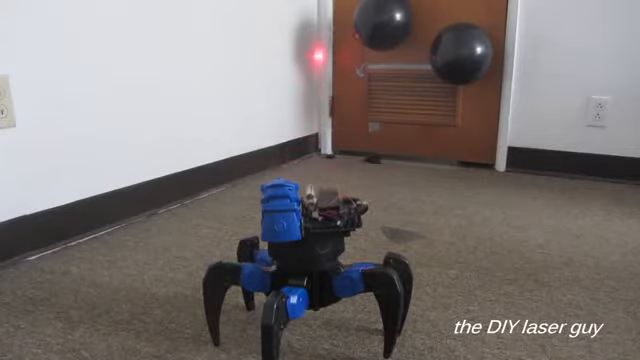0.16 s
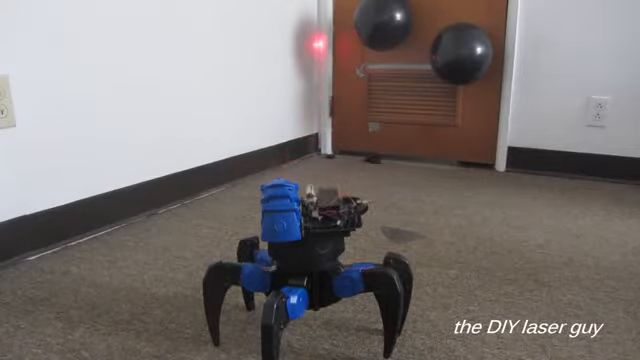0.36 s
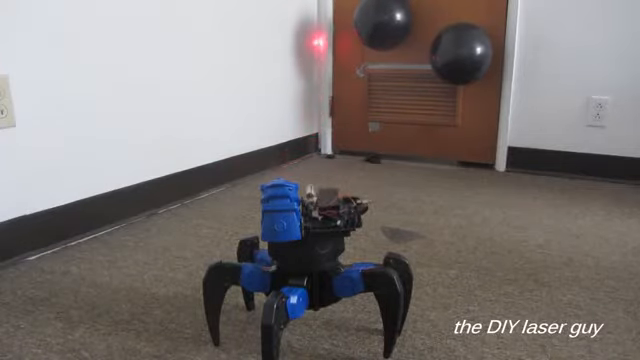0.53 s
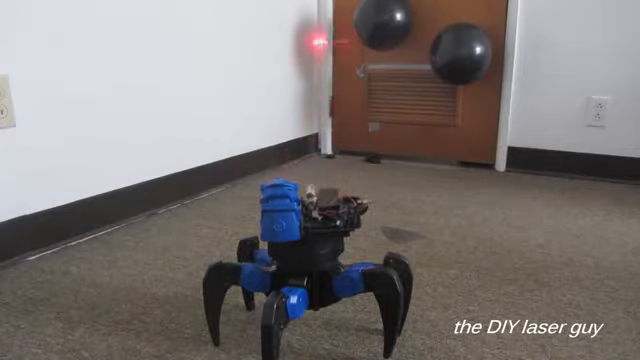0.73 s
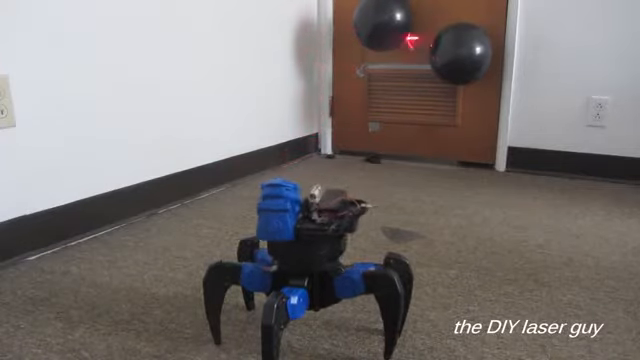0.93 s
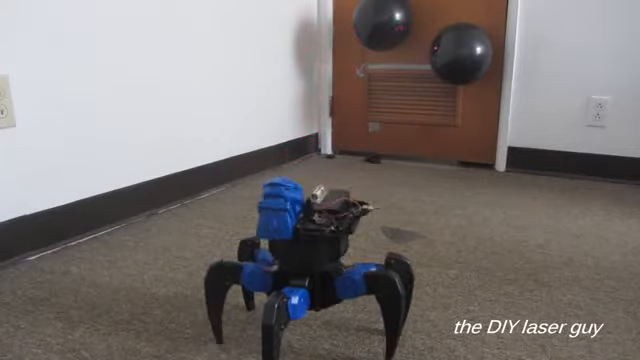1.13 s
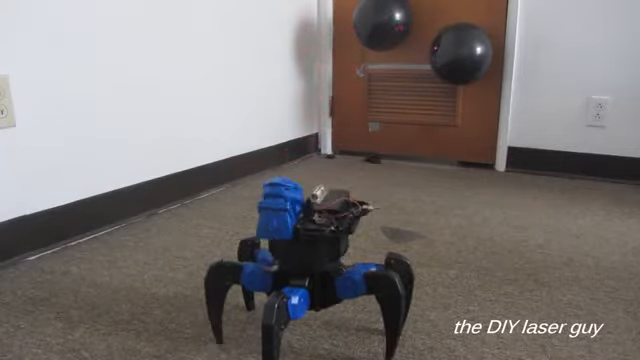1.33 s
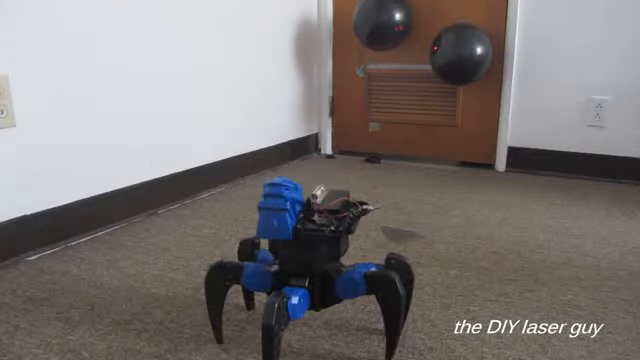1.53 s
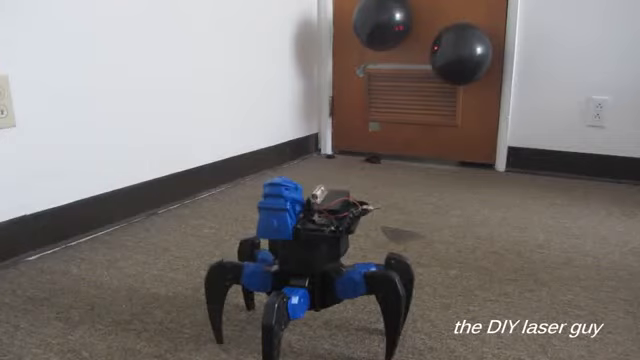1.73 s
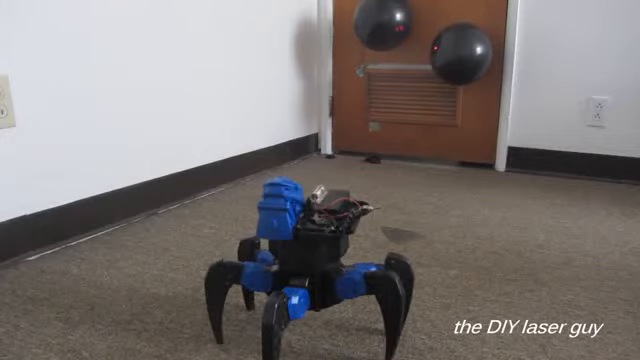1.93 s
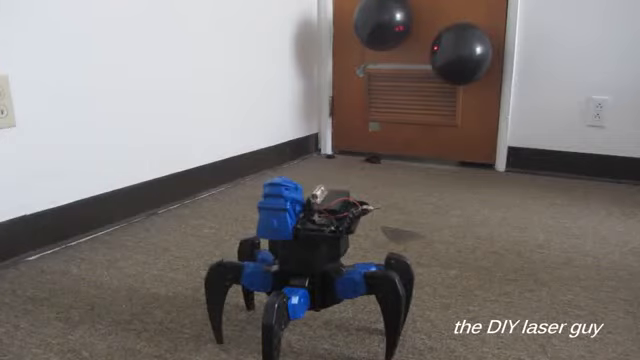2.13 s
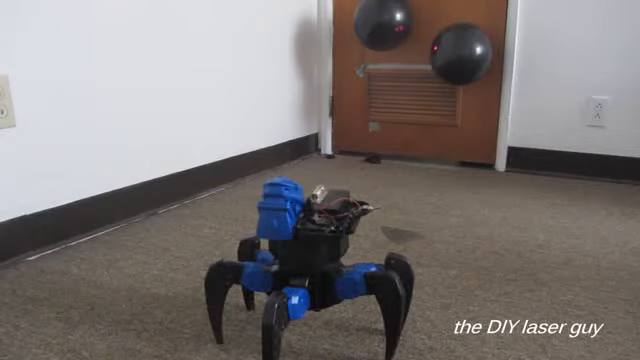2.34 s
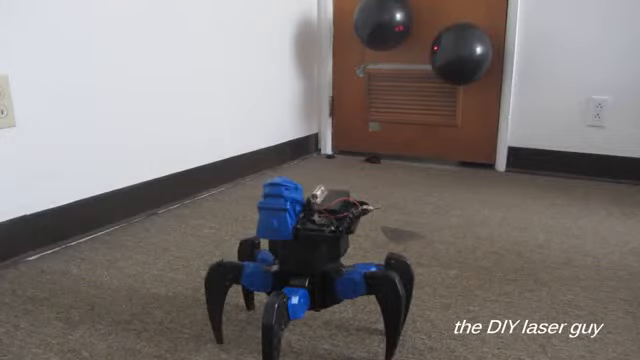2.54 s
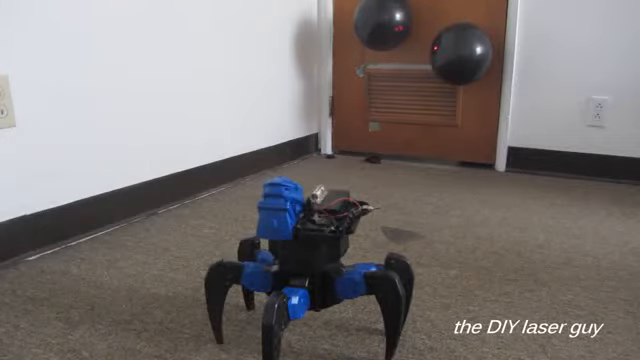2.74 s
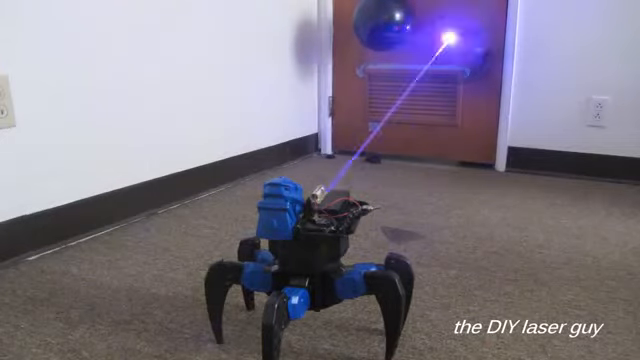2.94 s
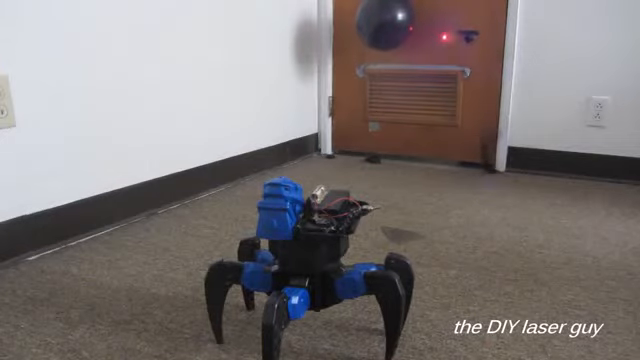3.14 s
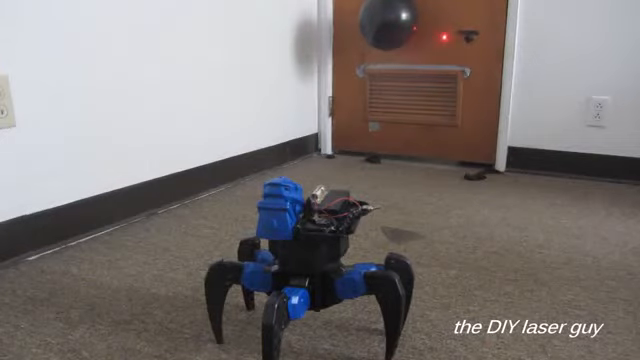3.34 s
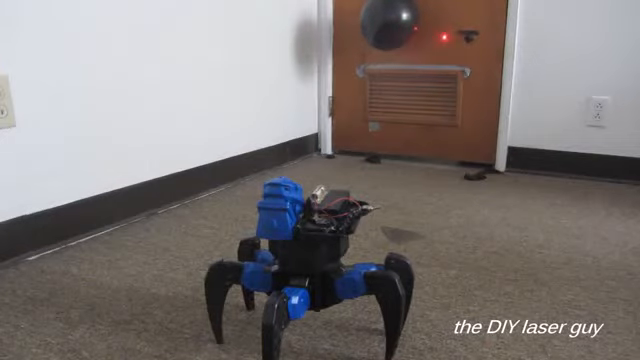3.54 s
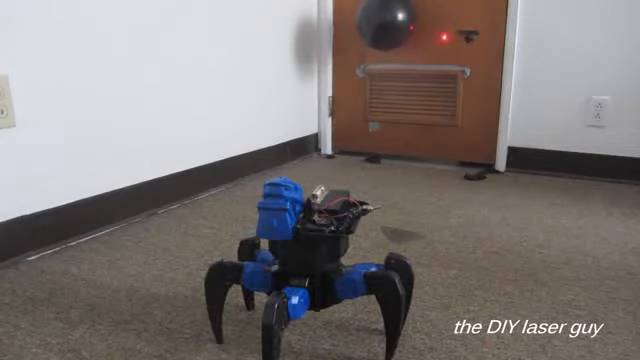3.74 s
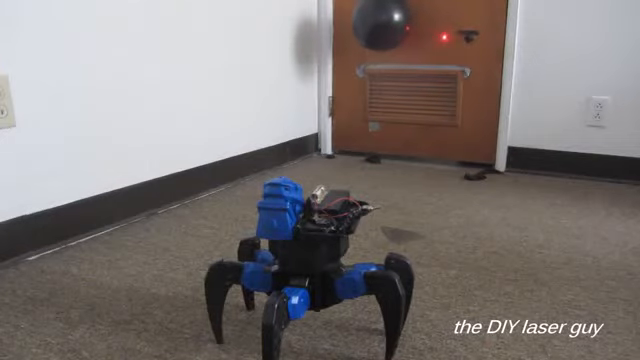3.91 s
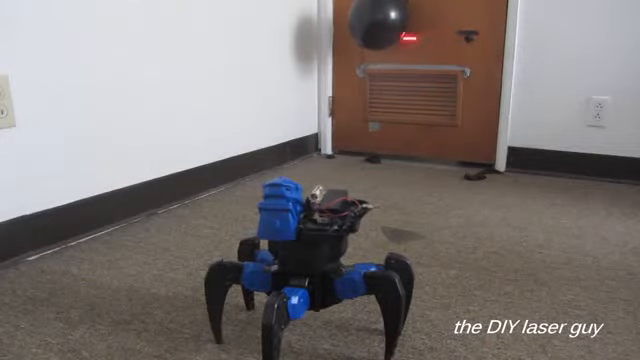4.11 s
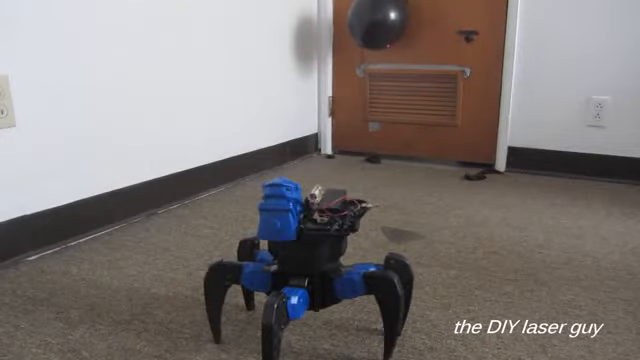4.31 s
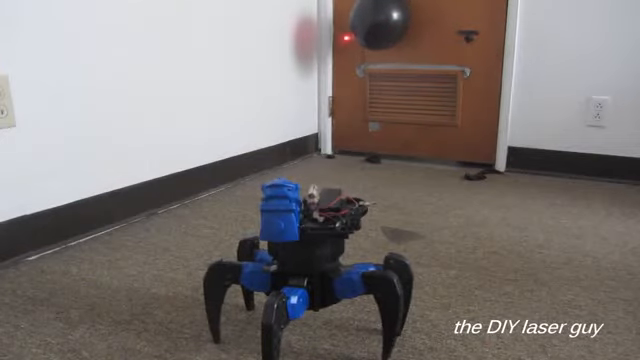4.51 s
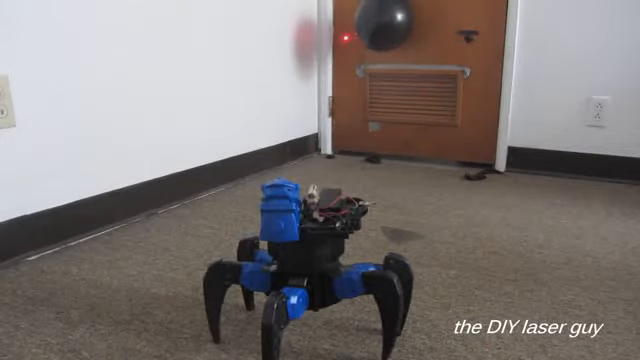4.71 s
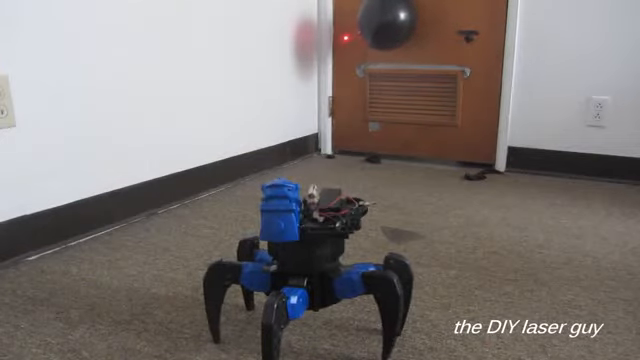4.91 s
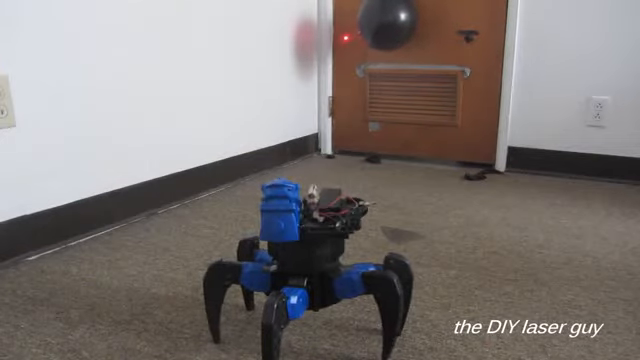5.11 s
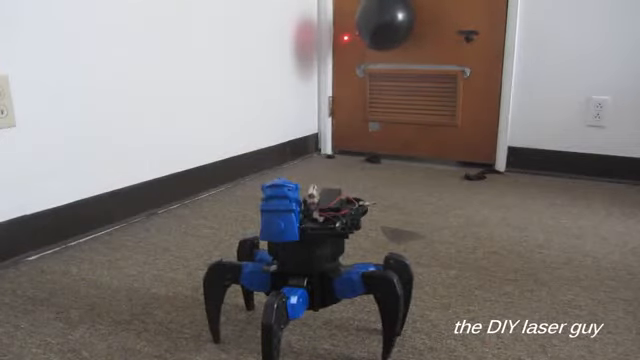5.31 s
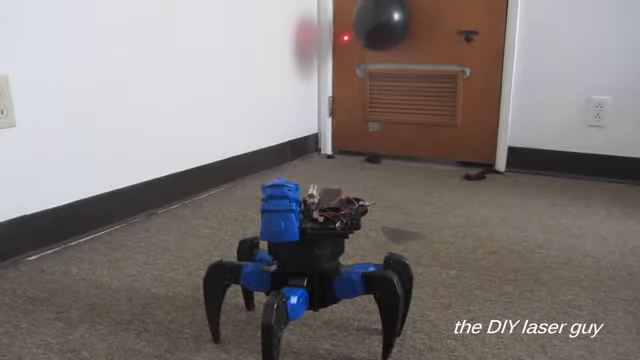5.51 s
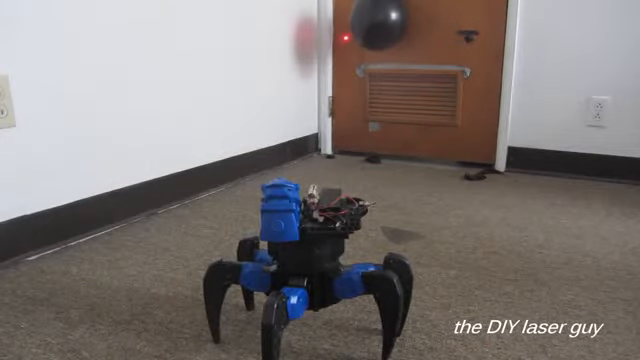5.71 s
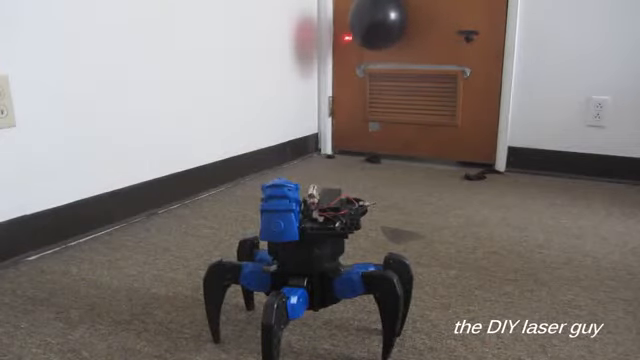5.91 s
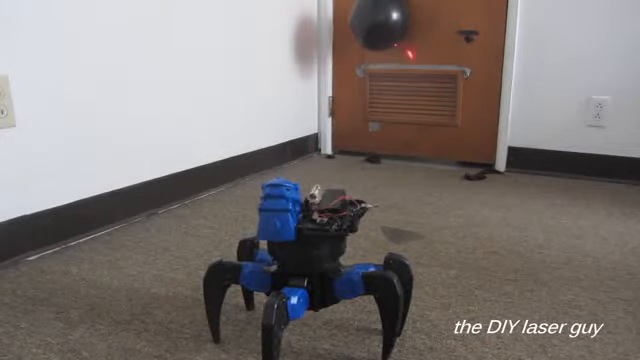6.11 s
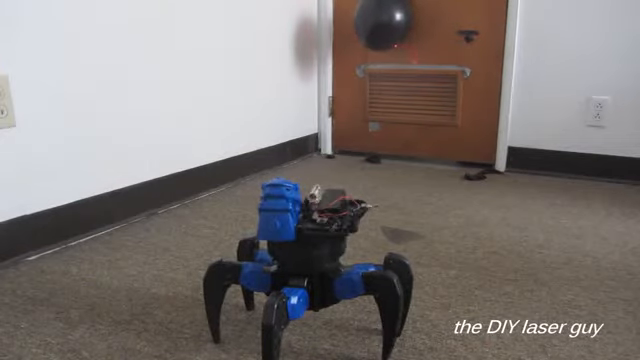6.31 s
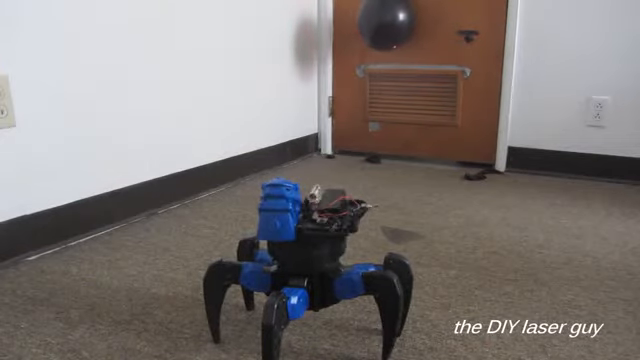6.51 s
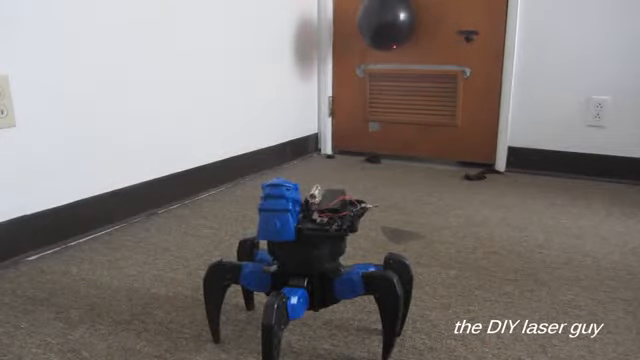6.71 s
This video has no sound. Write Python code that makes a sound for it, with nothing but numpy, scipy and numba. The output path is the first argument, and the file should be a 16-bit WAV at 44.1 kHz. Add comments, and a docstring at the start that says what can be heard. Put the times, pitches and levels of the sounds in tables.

```python
"""A bare, carpeted room: a toy robot tilts and turns its turret in short motor bursts, made of gear
knocks ringing through resonances; buttons of a hand control click close by as struck case modes.
A balloon on the far door bursts as an N-shaped pulse, and the room answers with decaying noise.
The recorder's gain control ducks at the bang and creeps back, lifting the room tone with it."""
import sys
import numpy as np
from scipy import signal
from scipy.fft import rfft, irfft, next_fast_len
from scipy.io import wavfile
from numba import njit

SR = 44100
rng = np.random.default_rng(int(sys.argv[2]) if len(sys.argv) > 2 else 0)


def generate_wav(sig):
    """Save sig (samples, or channels by samples) to the path in sys.argv[1] as 16-bit PCM at SR."""
    pcm = np.round(np.clip(np.atleast_2d(sig).T, -1, 1) * 32767).astype(np.int16)
    wavfile.write(sys.argv[1], SR, pcm)


def rack_gain(trim_db):
    """Turn a fader trim in dB into the linear factor to multiply a signal by."""
    fader = np.asarray(trim_db, float)
    return 10 ** (fader / 20)


N = 297675
TIME = np.arange(N) / SR   # [s]
BURST_S = 3.0497


def rms_one(x):
    """Normalization: scale a signal to rms 1."""
    return x / np.sqrt(np.mean(x ** 2) + 1e-20)


def at_hz(points, hz):
    """Interpolation on a logarithmic frequency axis in a table of (frequency [Hz], value)."""
    table = np.array(points)
    return np.interp(np.log(hz), np.log(table[:, 0]), table[:, 1])


def filtered(x, order, hz, kind="low"):
    """Butterworth filtering: a maximally flat pass band above or below a corner frequency."""
    return signal.sosfilt(signal.butter(order, hz, kind, fs=SR, output="sos"), x)


def colour(x, spectrum):
    """Spectral shaping: multiply the spectrum by a gain table of (frequency [Hz], level [dB])."""
    size = next_fast_len(x.shape[-1])
    hz = np.maximum(np.fft.rfftfreq(size, 1 / SR), 1)
    return irfft(rfft(x, size) * rack_gain(at_hz(spectrum, hz)), size)[..., :x.shape[-1]]


def stereo_noise(likeness, count):
    """Interchannel correlation: independent mid and side noise, weighted at each frequency."""
    size = next_fast_len(count)
    hz = np.maximum(np.fft.rfftfreq(size, 1 / SR), 1)
    alike = np.clip(at_hz(likeness, hz), -1, 1)
    mid, side = rfft(rng.standard_normal((2, size)))
    both = mid * np.sqrt(1 + alike) + side * np.sqrt(1 - alike) * [[1], [-1]]
    return irfft(both, size)[:, :count]


def resonate(x, modes):
    """Modal superposition: parallel two-pole resonances with alternating signs, scaled to rms 1."""
    out = 0
    for k, (hz, width, level_db) in enumerate(modes):
        r = np.exp(-np.pi * width / SR)
        poles = [1, -2 * r * np.cos(2 * np.pi * hz / SR), r * r]
        zeros = [(1 - r * r) / 2, 0, (r * r - 1) / 2]
        out = out + (-1) ** k * rack_gain(level_db) * signal.lfilter(zeros, poles, x)
    return rms_one(out)


@njit
def glide(x, turn, r):
    """Time-varying resonance: pole radius r is fixed, turn is the cosine of the moving pole angle."""
    y = np.zeros(len(x))
    for i in range(2, len(x)):
        y[i] = x[i] - x[i - 2] + 2 * r * turn[i] * y[i - 1] - r * r * y[i - 2]
    return y


def ring(blows, hz, t60):
    """Impulse response of a damped mode: a unit blow starts a decaying sine of initial height 1."""
    r, w = rack_gain(-60 / (t60 * SR)), 2 * np.pi * hz / SR
    return signal.lfilter([0, np.sin(w)], [1, -2 * r * np.cos(w), r * r], blows)


def room_tone():
    """Stationary noise: shaped air and building noise, with a swelling bass drone and a dying rumble."""
    # spectrum of the air and building noise: (frequency [Hz], relative spectral level [dB])
    tone_spectrum = [(12, -44.5), (20, -22.5), (87, -5), (197, -2.5), (237, -5.5), (434, -10), (1380, -20),
                     (1580, -23), (2740, -26.5), (3760, -33), (5570, -31.5), (8720, -41), (10800, -46),
                     (14000, -71.5), (22000, -120)]
    # left-right likeness of that noise: (frequency [Hz], correlation [-1 to 1])
    tone_likeness = [(60, 0.29), (140, -0.6), (330, -0.6), (790, -0.18), (1850, 0.27), (4370, -0.048),
                     (10300, 0.82)]
    # swells of a distant drone: (time of the maximum [s], level [dB])
    swells = [(0.95, -68.5), (1.75, -63.5), (2.3, -64), (2.85, -64), (3.94, -69.5), (5.08, -71.5),
              (5.7, -61)]
    swell_db_per_s, drone_low_db = 31, -95.5
    tone_db, rumble_db, rumble_t60_s = -55.5, -63.5, 3.0

    air = rack_gain(tone_db) * rms_one(colour(stereo_noise(tone_likeness, N), tone_spectrum))
    # the same narrow resonance twice gives steeper skirts
    drone_mode = [(90, 8.8, 0)]
    drone = resonate(resonate(rng.standard_normal(N), drone_mode), drone_mode)
    swell_db = np.max([db - swell_db_per_s * np.abs(TIME - s) for s, db in swells], axis=0)
    drone = rack_gain(np.maximum(swell_db, drone_low_db)) * drone
    rumble_noise = resonate(rng.standard_normal(N), [(55, 40, 0)])
    rumble = rack_gain(rumble_db - 60 * TIME / rumble_t60_s) * rumble_noise
    return air + rumble + drone


def room_response():
    """Diffuse reverberation: overlapping half-octaves of noise, each dying at its own rate."""
    # reverberation of the room: (frequency [Hz], t60 [s])
    room_t60 = [(60, 0.84), (160, 0.64), (420, 0.66), (1100, 0.74), (2910, 0.8), (7680, 0.51)]
    # left-right likeness of the reflections: (frequency [Hz], correlation [-1 to 1])
    room_likeness = [(60, 0.76), (110, 0.78), (220, 0.75), (410, 0.52), (790, 0.19), (1500, 0.12),
                     (2850, 0.3), (5420, 1), (10300, 0.81)]
    t, out = TIME[:SR], 0
    noise = rfft(stereo_noise(room_likeness, SR))
    octave = np.log2(np.arange(SR // 2 + 1) + 1)
    for centre in np.arange(5, 14.1, .5):   # log2 of the centre frequency in Hz
        t60 = at_hz(room_t60, 2 ** centre)
        band = irfft(noise * np.maximum(1 - 2 * np.abs(octave - centre), 0), SR)
        # a slower decay starts lower, so that every band carries the same energy per Hz
        out = out + band * rack_gain(-60 * t / t60) / np.sqrt(t60 * SR / 14)
    return out * (1 - np.exp(-t / 0.0043))   # reflections thicken over the first milliseconds


def balloon():
    """N-wave radiation: a falling pressure ramp, doubled by door and floor, on a slow push of air."""
    burst_db, burst_ms = -3, .62
    phase = (TIME - BURST_S) / (burst_ms / 1000)
    pulse = np.where((phase > 0) & (phase < 1), 1 - 2 * phase, 0)
    pulse = filtered(pulse, 2, 3500)
    crack = pulse
    for delay_s, gain in [(0.00051, 1.4), (0.0016, 1.8), (.0034, 1.4)]:
        crack = crack + gain * np.roll(pulse, round(delay_s * SR))
    # the released air: a half sine of 1 ms
    push = np.sin(np.pi * np.clip((TIME - BURST_S - .0005) / .001, 0, 1))
    return rack_gain(burst_db) * filtered(crack + 0.47 * push, 2, 130., "high")


def balloon_tail(room):
    """Reverberation and modal decay: the walls return the bang, and the shaken door rings on."""
    # bang as the room returns it: (frequency [Hz], relative spectral level [dB])
    burst_colour = [(24, -60), (40, -26), (115, -17), (167, -3.5), (231, -9.5), (307, 1), (378, -8.5),
                    (406, -1.5), (664, -10), (764, -14.5), (1340, -12), (1650, -6), (2520, -18.5),
                    (3200, -17.5), (3750, -24.5), (6280, -23), (10800, -33.5), (14000, -74), (22000, -120)]
    # door panels shaken by the bang: (frequency [Hz], relative level [dB], t60 [s])
    door_modes = [(175, -6, .6), (269, -4, .6), (312, 0, .75), (412, -4, .9), (462, -8, .9),
                  (480, -10, 1.2), (515, -8, 1.0), (567, -8, 1.15), (673, -11, .7), (1230, -12, .7),
                  (1604, -10, 1.0), (1670, -6, .9), (1790, -12.5, .8), (1965, -13, 1.15), (1990, -15, 1.0)]
    start = round((BURST_S + .001) * SR)
    tail, blow = np.zeros((2, N)), np.full(N, 1e-18)
    tail[:, start:start + room.shape[1]] = room
    blow[start] = 1
    door = 0
    for hz, level_db, t60 in door_modes:
        channel_gains = rng.uniform(.6, 1, (2, 1))
        door = door + rack_gain(level_db) * channel_gains * ring(blow, hz, t60)
    walls = colour(tail, burst_colour) * (TIME > BURST_S)
    return rack_gain(48.5) * walls + rack_gain(-11.5) * door


def buttons():
    """Impact excitation: a run of contacts rings case modes near its pitch most, its snap all of them."""
    # clicks: (time [s], relative peak level [dB], strongest pitch [Hz], snap re peak [dB], ring re peak [dB])
    click_table = [(1.194, -36.5, 679, -32.5, -43), (1.532, -46, 1020, -15.5, -47),
                   (1.874, -32.5, 462, -26, -36), (1.883, -36, 770, -33, -46),
                   (2.74, -40.5, 2134, -17, -31.5), (4.27, -38, 484.5, -24, -34),
                   (4.526, -39, 496, -6, -37), (4.76, -36.5, 557, -23.5, -54),
                   (4.878, -61.5, 1200, -14, -25), (5.163, -40, 473, -38.5, -40),
                   (5.261, -32, 900, -26, -51.5), (5.494, -36, 670, -16.5, -44),
                   (5.746, -34, 840, -16.5, -26), (6.434, -39.5, 3170, -10.5, -28.5),
                   (6.713, -46.5, 3100, -29, -20.5)]
    # case of the hand control: (frequency [Hz], relative level [dB], t60 [s])
    case_modes = [(474, 0, .022), (813, 0, .025), (1250, -2, .012), (1850, -3, .008), (2450, -4, .006),
                  (3400, -1, .006), (3900, -3, .004), (4500, -3, .004), (5900, -2, .007), (7500, -8, .003)]
    s, peak_db, pitch, snap_db, ring_db = np.transpose(click_table)
    # three contacts, their spacing scaled at random
    contact_s = 0.0014 * np.array([0, .38, 1]) * rng.uniform(0.68, 0.9, (len(s), 3))
    at = ((s[:, None] + contact_s) * SR).astype(int)
    blows = np.full(N, 1e-18)
    blows[at[:, 0]] = rack_gain(peak_db + ring_db)
    # a close pair of modes in the hollow case beats and rings on
    out = sum(ring(blows, hz, .4) for hz in [795, 850])
    for hz, level_db, t60 in case_modes:
        near = np.exp(-(np.log2(hz / pitch) / .65) ** 2)   # nearness on an octave scale
        size = rack_gain(peak_db + level_db - 2.5) * (near + rack_gain(snap_db))
        blows = np.full(N, 1e-18)
        blows[at] = size[:, None] * [1, .35, .4]   # the bounces are weaker
        out += ring(blows, hz, t60)
    return filtered(out, 2, 300, "high")


def strokes():
    """Envelope control: the loudest stroke sets rattle, cover, gearbox frequency, boom and treble."""
    # motor strokes that tilt the turret: (start [s], spin-up [s], run-down [s], relative peak level [dB],
    # gearbox resonance at the peak [Hz])
    tilts = [(-0.04, 0.061, 0.11, -42.5, 2250), (0.12, 0.071, 0.21, -41.5, 2190),
             (0.29, 0.073, 0.21, -42, 2160), (0.44, 0.055, 0.069, -42.5, 2240)]
    # motor strokes that turn the turret: the same columns and units
    turns = [(0.785, 0.063, 0.29, -40.5, 2590), (0.969, 0.085, 0.085, -42.5, 2470),
             (1.11, 0.031, 0.014, -46, 2400), (4.109, 0.064, 0.1, -43, 3230),
             (4.437, 0.065, 0.091, -44.5, 2520), (5.089, 0.002, 0.057, -54.5, 2280),
             (5.656, 0.0075, 0.056, -50.5, 2130), (5.99, 0.059, 0.092, -43, 2540),
             (6.109, 0.026, 0.057, -52.5, 2520)]
    # a stroke begins and ends under its peak, then dies away
    start_db, run_down_db, stop_db_per_s = -11.5, -11.5, -220.
    # the gearbox resonance sinks to rest as the rattle falls
    rest_hz, gearbox_sag_db = 2200, 9.0
    # shell and teeth re rattle
    tilt_boom_db, turn_boom_db = -7.5, -16
    tilt_treble_db, turn_treble_db = -8.5, -12
    # duller, with less cover, until the gears move
    stalled_treble_db, stalled_cover_db, get_going_s = -16.0, -8.0, .035
    # the cover at a rattle of -45 dB, and the share of the rattle's swing that it follows
    cover_base_db, cover_follows = -56, 0.39

    start, up, down, peak_db, top_hz = np.vstack([tilts, turns]).T
    heights = [start_db, 0, run_down_db, run_down_db + stop_db_per_s]
    shapes = [np.interp(TIME, [s, s + u, s + u + d, s + u + d + 1], heights, left=-300)
              for s, u, d in zip(start, up, down)]
    levels = peak_db[:, None] + shapes
    lead, level_db = levels.argmax(axis=0), levels.max(axis=0)
    tilting = lead < len(tilts)
    r = np.exp(-1 / (get_going_s * SR))
    moving = signal.lfilter([1 - r], [1, -r], level_db > -62, zi=[r])[0]   # 0 stalled, 1 moving
    effort = np.clip(1.5 + (level_db - peak_db[lead]) / gearbox_sag_db, 0, 1) * moving
    gearbox_hz = rest_hz + effort * (top_hz[lead] - rest_hz)
    boom_db = np.where(tilting, tilt_boom_db, turn_boom_db)
    treble_db = np.where(tilting, tilt_treble_db, turn_treble_db) + stalled_treble_db * (1 - moving)
    # levels re rattle: the cover never exceeds the rattle
    cover_db = np.minimum(cover_base_db + cover_follows * (level_db + 45) - level_db, 0)
    cover_db = cover_db + stalled_cover_db * (1 - moving)
    return level_db, cover_db, gearbox_hz, boom_db, treble_db


def motor():
    """Source-filter principle: dense, uneven gear knocks ring in shell, housing, cover and teeth."""
    # modes of the hollow body: (frequency [Hz], width [Hz], relative level [dB])
    shell_modes = [(550, 215, -2), (816, 19, 10), (900, 190, -3.5)]
    # modes of the gear housing: (frequency [Hz], width [Hz], relative level [dB])
    housing_modes = [(2240, 1500, -1.5), (2870, 170, -41), (3190, 230, -11.5)]
    # modes of the gear teeth: (frequency [Hz], width [Hz], relative level [dB])
    teeth_modes = [(4350, 990, -34), (6080, 5340, 6.5), (7060, 1330, 11), (10260, 6400, -23)]
    # modes of the turret cover: (frequency [Hz], width [Hz], relative level [dB])
    cover_modes = [(1257, 44, 14), (1540, 164, 31.5)]
    sizes = rack_gain(0.42 * np.minimum(rng.exponential(1, N), 5)) * rng.choice([-1, 1], N)
    knocks = sizes * (rng.random(N) < 1800. / SR) + 1e-9   # 1800 knocks a second on average
    level_db, cover_db, hz, boom_db, treble_db = strokes()
    # knocks in reverse order make the gearbox independent of the housing; width 250 Hz
    gearbox = glide(knocks[::-1].copy(), np.cos(2 * np.pi * hz / SR), np.exp(-np.pi * 250. / SR))
    rattle = rms_one(resonate(knocks, housing_modes) + rack_gain(-1.0) * rms_one(gearbox))
    rattle = filtered(rattle, 4, 1600, "high")   # the housing is too small to boom
    rattle = filtered(rattle, 2, 3600.)          # and its walls damp the top
    cover = resonate(resonate(knocks, cover_modes), [(1540, 5400, 0)])
    boom = rack_gain(boom_db) * resonate(knocks, shell_modes)
    treble = rack_gain(treble_db) * resonate(knocks, teeth_modes)
    return rack_gain(level_db) * (rattle + rack_gain(cover_db) * cover + boom + treble)


def scene():
    """Linear superposition: direct sounds, their reflections by convolution, and the room tone."""
    room, gears, clicks = room_response(), motor(), buttons()
    wet = rack_gain(-11.0) * gears + rack_gain(-9.0) * clicks
    echoes = signal.oaconvolve(wet[None], room, axes=1)[:, :N]
    bang = balloon() + balloon_tail(room)
    # hands, floor and wall next to the control: a faster decay
    corner = room[:, :SR // 4] * rack_gain(-60 * TIME[:SR // 4] / 0.093)
    near = clicks + rack_gain(4.0) * signal.oaconvolve(clicks[None], corner, axes=1)[:, :N]
    near = near * rack_gain([[-2.5], [2.5]])   # the control lies to the right
    far = (gears + echoes + bang) * rack_gain([[-1.2], [1.2]])
    return far + near + room_tone() * rack_gain([[-.6], [.6]])


def top_cut(x):
    """Nothing passes above the cut-off."""
    return signal.sosfilt(signal.butter(12, 10910, fs=SR, output="sos"), x)


def record(dry):
    """Dynamic compression: gain ducks in milliseconds and recovers slowly; peaks past full scale clip."""
    threshold_db, makeup_db, recover_db_per_s, still_down_db = -16.5, 9.5, 3.5, 10.5
    quick_db, quick_recover_db_per_s = 6.5, 60.   # the top of the duck comes back fast
    over = 20 * np.log10(np.abs(dry).max(axis=0) + 1e-9) - threshold_db
    slow = over - quick_db
    slow[0] = still_down_db   # an earlier bang still holds the gain down
    holds = [np.maximum.accumulate(db + rate * TIME) - rate * TIME
             for db, rate in [(slow, recover_db_per_s), (over, quick_recover_db_per_s)]]
    held = np.max(holds, axis=0).clip(0)
    r = np.exp(-1 / (0.0022 * SR))   # attack time constant 2.2 ms
    cut_db = signal.lfilter([1 - r], [1, -r], held, zi=[still_down_db * r])[0]
    loud = np.clip(dry * rack_gain(makeup_db - cut_db), -1, 1)
    # a steep low-pass: 60 dB down from 11150 Hz
    loud = signal.sosfilt(signal.cheby2(12, 60, 11150, fs=SR, output="sos"), loud)
    return top_cut(np.clip(loud, -1, 1))


dry = scene()
out = record(dry)
generate_wav(out)
```